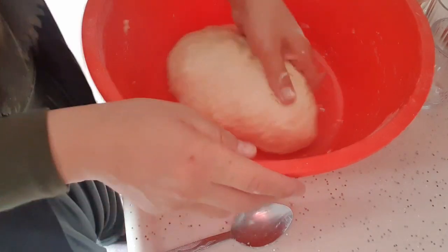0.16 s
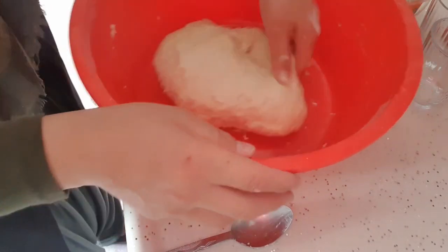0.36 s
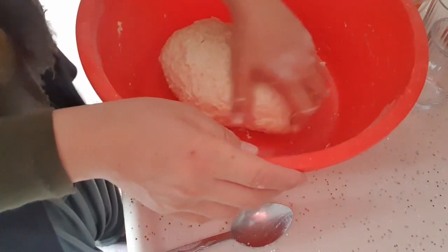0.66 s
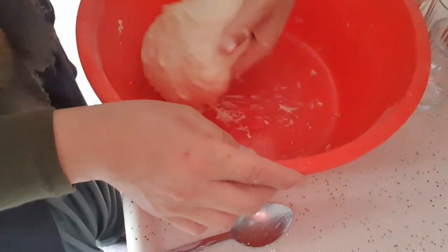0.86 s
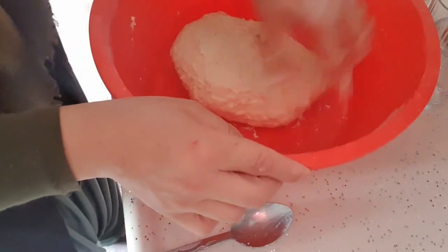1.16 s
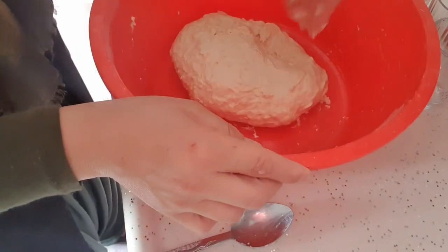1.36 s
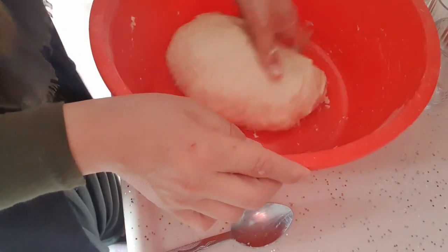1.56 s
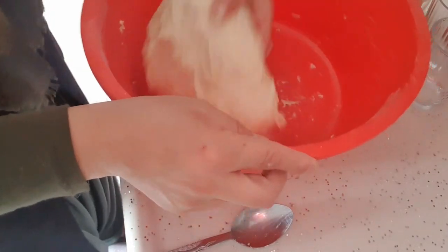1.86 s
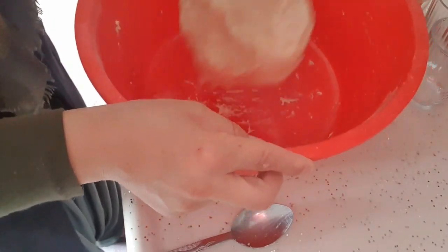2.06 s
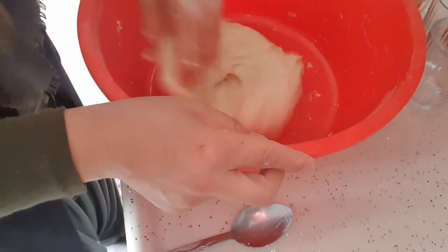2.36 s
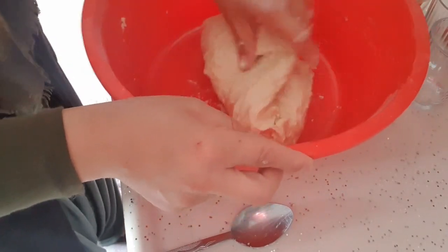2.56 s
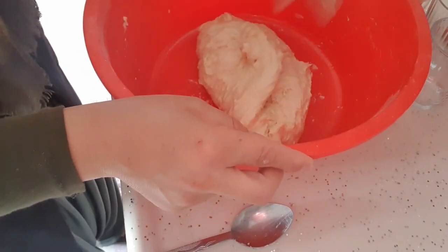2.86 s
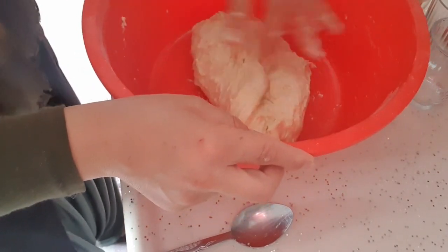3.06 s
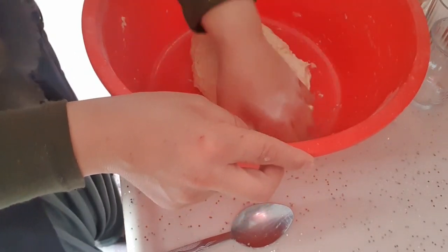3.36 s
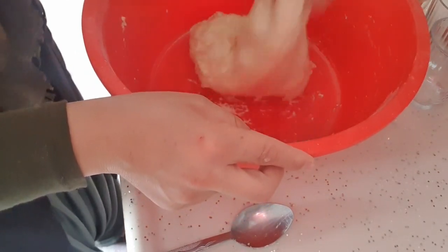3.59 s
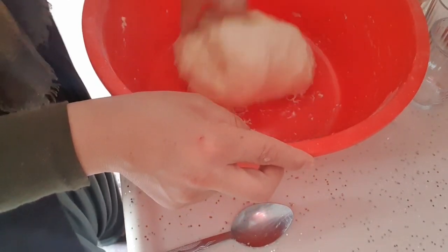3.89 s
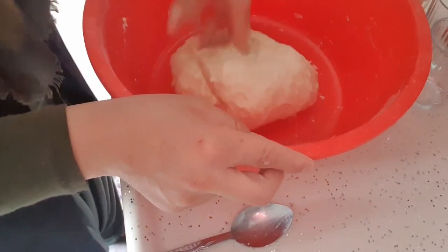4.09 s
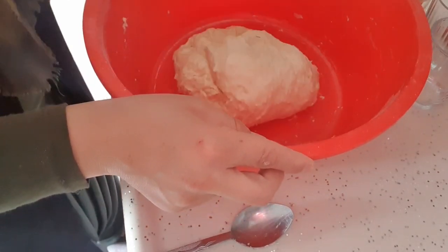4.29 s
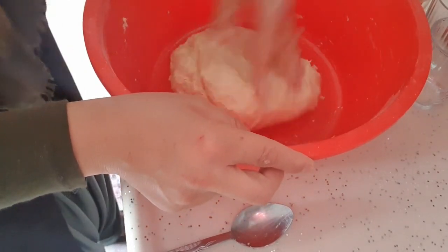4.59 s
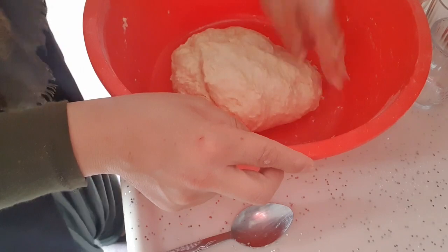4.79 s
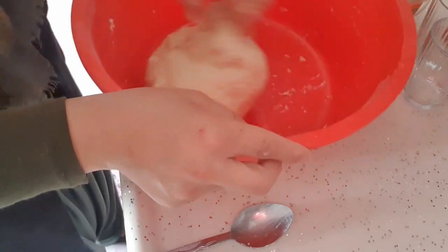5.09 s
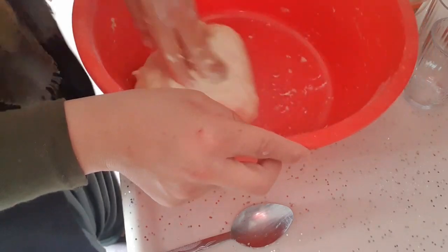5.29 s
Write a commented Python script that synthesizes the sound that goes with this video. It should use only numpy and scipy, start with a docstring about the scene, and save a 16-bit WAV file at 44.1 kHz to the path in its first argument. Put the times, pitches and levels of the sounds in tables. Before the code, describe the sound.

A hand kneads soft, sticky dough in a plastic bowl, with irregular wet slaps, hollow thuds and quiet squelches in a kitchen.

```python
"""A hard-walled kitchen, where an oiled hand kneads soft, sticky dough in a plastic bowl on the counter.
Each blow drives the bowl's mass-loaded base into damped vibration, slaps wetly and pops out trapped air.
Between blows the dough squelches and peels off the plastic: tiny cavities ring, folds slip, threads snap.
Diffuse reflections give a brief reverberation, and an appliance hums over the low rumble of the room."""
import sys
import numpy as np
from scipy import signal
from scipy.fft import rfft, irfft, next_fast_len
from scipy.io import wavfile

SR = 44100
rng = np.random.default_rng(int(sys.argv[2]) if len(sys.argv) > 2 else 0)


def generate_wav(signal):
    """Clip the signal to [-1, 1] and save it as 16-bit WAV at the path in sys.argv[1]."""
    frames = np.transpose(np.atleast_2d(signal))
    scaled = np.clip(frames, -1, 1) * 32767
    pcm = np.round(scaled).astype(np.int16)
    wavfile.write(sys.argv[1], SR, pcm)


N = 239859
TIME = np.arange(N) / SR
EVENT_TIME = TIME[:SR * 3 // 5]   # time axis of a single event
EVENT_N = len(EVENT_TIME)


# Dough landing on the base: (time [s], level [dB], loaded base pitch [Hz], contact hardness [Hz],
# counter boom [dB re level], wall ring [dB re level])
DOUGH_IMPACTS = [(0.091, -30, 115.8, 900, 0, -6), (0.284, -15, 141.6, 501.5, -23, -0.5),
                 (0.695, -35, 136, 143, -12, -2.5), (1.018, -20, 132.8, 350, -21, 0.5),
                 (1.526, -14.5, 146.5, 606, -23, 5.5), (1.546, -15, 223.8, 608, -20, -4.5),
                 (2.287, -36.5, 127, 870, -12, -4), (2.406, -25, 115.7, 710, 5, -16),
                 (2.992, -55, 215.8, 600, -10, -0.5), (3.320, -23, 126.9, 180.4, -8, 3),
                 (4.208, -56.5, 215.8, 696, -10, 9.5), (4.480, -40.5, 115, 697, 4, 5),
                 (4.909, -37, 140.9, 425, 4, 2)]

def thuds(base_t60=0.074, squash_s=0.0019, counter_hz=62, counter_t60=0.34):
    """Mass loading: the lump drives the base and lowers its pitch; wall and counter shake along."""
    out, impulse = np.zeros(N), signal.unit_impulse(EVENT_N)
    for s, db, hz, hardness_hz, boom_db, wall_db in DOUGH_IMPACTS:
        force = low_pass(impulse, hardness_hz, order=2)
        base = 2 * resonator(force, hz, base_t60) * (1 - np.exp(-EVENT_TIME / squash_s))
        counter = resonator(force, counter_hz, counter_t60) * (1 - np.exp(-EVENT_TIME * counter_hz))
        add(out, s, from_db(db) * (base + from_db(boom_db) * counter + from_db(wall_db) * bowl(force)))
    return out


# Modes of the bowl's wall: (frequency [Hz], level [dB], t60 [s])
WALL_MODES = [(213, -9.5, 0.14), (283.4, -13, 0.097), (351, -16.5, 0.11), (470.7, -24, 0.36),
              (587, -17.5, 0.085), (681.6, -30.5, 0.16), (829, -27, 0.4), (833, -38, 0.046),
              (1048, -30.5, 0.13), (1305, -30.5, 0.058), (1650, -35, 0.11), (2250, -29, 0.043),
              (2360, -32.5, 0.092)]

def bowl(force):
    """Modal superposition: the plastic wall responds as a sum of damped modes of alternating sign."""
    return sum((-1) ** k * from_db(db) * resonator(force, hz, t60)
               for k, (hz, db, t60) in enumerate(WALL_MODES))


# Spectrum of a wet contact: (frequency [Hz], spectral density [dB])
SLAP_SPECTRUM = [(100, -5.5), (250, 1), (500, 5), (1000, 2), (2200, -3), (4000, -11), (6500, -15),
                 (15000, -18)]
# Wet skin or dough smacking down: (time [s], level [dB], rise [s], t60 [s], brightness [Hz])
WET_CONTACTS = [(0.0911, -32.5, 0.00052, 0.29, 2320), (0.285, -18, .0013, 0.042, 2080),
                (0.383, -36.5, .0012, 0.081, 3530), (0.405, -39.5, 0.00079, 0.071, 5000),
                (0.720, -41.5, 0.0066, 0.22, 5500), (1.0169, -21.5, 0.0022, 0.044, 2500),
                (1.511, -32.5, 0.00018, 0.046, 3000), (1.528, -25.5, 0.00059, 0.32, 1600),
                (1.557, -20.5, .003, 0.11, 1300), (2.286, -49, 0.0011, 0.16, 750),
                (2.411, -10, 0.0012, 0.055, 4213), (3.324, -51, 0.0022, 0.32, 450),
                (3.368, -50.5, 0.023, 0.16, 2965), (4.462, -46, 0.002, 0.072, 7000),
                (4.906, -55, 0.0026, 0.17, 2980)]

def slaps(grain_db=7.0, head_on_db=-3, balance_db=1, low_edge_ratio=0.2, lead_s=0.04):
    """Impact noise: a wet contact swells as the gap closes, then spreads as a burst of tiny collapses."""
    out = np.zeros((2, N))
    for s, db, rise_s, t60, bright_hz in WET_CONTACTS:
        sizes = from_db(grain_db * np.repeat(rng.standard_normal(EVENT_N), 20)[:EVENT_N])
        noise = diffuse_noise(EVENT_N) + from_db(head_on_db) * rng.standard_normal(EVENT_N)
        burst = coloured(noise * sizes, SLAP_SPECTRUM)
        burst = high_pass(burst, low_edge_ratio * bright_hz)   # smaller contacts sound thinner
        burst = unit_rms(low_pass(burst, bright_hz, order=1))
        since_peak = EVENT_TIME - lead_s
        envelope = np.exp(np.minimum(since_peak / rise_s, -np.log(1000) * since_peak / t60))
        add(out, s - lead_s, from_db(db) * lean_left(balance_db) * burst * envelope)
    return out


# Air forced out from under the dough: (time [s], level [dB], pitch [Hz])
AIR_POCKETS = [(0.285, -15, 388), (0.287, -17.5, 774), (0.296, -23, 501), (1.541, -4.5, 803),
               (1.548, -17, 320), (1.555, -7, 828), (1.891, -42.5, 765), (1.892, -36.5, 1220),
               (2.41, -9, 462), (2.4125, -11.5, 1010), (2.413, -15, 1650), (3.5, -44.5, 867),
               (4.211, -54.5, 786), (4.462, -36, 378), (4.465, -39.5, 797), (4.668, -47.5, 426)]

def pops(opening_hz=2500, t60_cycles=21.0):
    """Cavity resonance: escaping air rings briefly; so small a source radiates little below its pitch."""
    out = np.zeros(N)
    puff = low_pass(signal.unit_impulse(EVENT_N), opening_hz, order=2)
    for s, db, hz in AIR_POCKETS:
        add(out, s, from_db(db) * resonator(high_pass(puff, hz / 2), hz, t60_cycles / hz))
    return out


# Spectra of the squeezed dough and of the oily film: (frequency [Hz], spectral density [dB])
SQUELCH_SPECTRUM = [(200, -5), (500, 0.5), (800, 3.5), (1800, -1), (3000, -8), (6000, -16.5)]
FIZZ_SPECTRUM = [(2200, -13.5), (3500, 0.5), (5000, 6.5), (6300, 1), (9000, 1), (15000, 5.5)]

def squelching(squelch_db=-1, fizz_db=1, crackle_db=-14, bubbles_db=-8, crackles_per_s=150):
    """Bubble noise: dough crackles low and the oily film fizzes, each with a few larger bubbles."""
    squelch_gain, fizz_gain = kneading()
    squelch = cavities(SQUELCH_SPECTRUM, per_s=7600, spread_db=1.5, t60_cycles=23, clump_db=1.4, bands=22)
    fizz = cavities(FIZZ_SPECTRUM, per_s=5300, spread_db=0, t60_cycles=10, clump_db=3.5, bands=18)
    clicks = rng.standard_normal((2, N)) * (rng.random(N) < crackles_per_s / SR)
    crackle = unit_rms(high_pass(coloured(clicks, FIZZ_SPECTRUM), 2000))
    bubbles = cavities(SQUELCH_SPECTRUM, per_s=180, spread_db=3, t60_cycles=30, clump_db=1, bands=16)
    dough = squelch_gain * (squelch + from_db(bubbles_db) * bubbles)
    film = fizz_gain * (fizz + from_db(crackle_db) * crackle)
    return from_db(squelch_db) * dough + from_db(fizz_db) * film


def cavities(spectrum, per_s, spread_db, t60_cycles, clump_db, bands, swell_db=2.0):
    """Shot noise: tiny cavities burst in clumps, each ringing briefly at its own pitch."""
    sizes = from_db(spread_db * np.minimum(rng.exponential(1, N), 4) + clump_db * drift(120))
    clicks = rng.standard_normal((2, N)) * sizes * (rng.random(N) < per_s / SR)
    band_of_click, out = rng.integers(0, bands, N), 0
    for k, hz in enumerate(np.geomspace(spectrum[0][0], spectrum[-1][0], bands)):
        ringing = resonator(np.diff(clicks * (band_of_click == k), prepend=0), hz, t60_cycles / hz)
        ringing = unit_rms(ringing * from_db(swell_db * drift(25)))   # folds open and close
        gain = from_db(at_hz(spectrum, hz)) * np.sqrt(hz)   # higher bands are wider
        out = out + gain * stereo(ringing, hz)
    return unit_rms(out)


# The hand pressing into the dough: (start [s], duration [s], squelch [dB], fizz [dB])
HAND_PRESSES = [(0.095, 0.037, -46.5, -62), (0.371, 0.054, -38.5, -60), (0.706, 0.028, -46.5, -79),
                (1.548, 0.015, -30, -36.5), (2.431, 0.12, -44, -67.5), (2.989, 0.021, -59, -73.5),
                (3.344, 0.036, -47, -62), (4.471, 0.063, -62.5, -63.5), (4.901, 0.017, -64, -56.5)]
# Dough peeling off plastic or skin: (start [s], duration [s], squelch [dB], fizz [dB])
DOUGH_PEELS = [(-0.04, 0.15, -64, -80), (0.153, 0.16, -44, -55), (0.77, 0.19, -50.5, -58.5),
               (0.946, 0.07, -56, -69), (1.021, .2, -47.5, -58), (1.558, .29, -50, -57.5),
               (1.792, 0.21, -54.5, -64), (1.95, 0.15, -69, -81), (2.518, .19, -58, -67),
               (3.033, 0.11, -70.5, -64), (3.411, .16, -56.5, -63.5), (3.44, 0.56, -79, -74),
               (3.941, 0.3, -68, -63.5), (4.562, .15, -65.5, -61), (4.906, .29, -52.5, -58),
               (5.15, 0.5, -77.5, -76.5)]

def kneading(attack_s=0.031, release_t60=0.11, peel_exponent=1.1):
    """Incoherent addition: presses and peels sum in power to give the envelopes of squelch and fizz."""
    power = np.zeros((2, N))
    for s, duration, *levels in HAND_PRESSES:
        rise = np.clip((TIME - s) / attack_s, 0, 1)
        release = decay(np.maximum(TIME - s - duration, 0), release_t60)
        power += np.outer(from_db(levels), rise * release) ** 2
    for s, duration, *levels in DOUGH_PEELS:
        arch = np.abs(np.sin(np.pi * np.clip((TIME - s) / duration, 0, 1)))
        power += np.outer(from_db(levels), arch ** peel_exponent) ** 2
    return np.sqrt(power)


# Wet folds skidding on the plastic: (centre time [s], level [dB], half width [s], pitch [Hz], Q [-])
SLIPPING_FOLDS = [(0.036, -56, .03, 1510, 20), (0.115, -56, 0.018, 756, 2.3), (0.33, -36, 0.018, 610, 6),
                  (0.416, -35, 0.016, 1204, 18), (0.724, -38.5, 0.0093, 2050, 5.4),
                  (1.577, -46, .025, 11460, 3), (1.873, -53, 0.047, 1687, 3.2),
                  (2.111, -63.5, 0.015, 1250, 10.3), (2.29, -56, 0.0058, 1430, 7.8),
                  (4.079, -62, 0.044, 770, 12), (4.09, -66, 0.034, 1524, 3.3),
                  (4.132, -72, .07, 4800, 2.74), (4.69, -69, 0.044, 760, 5), (4.714, -79, 0.062, 4480, 30),
                  (4.724, -77.5, 0.047, 3570, 30), (5.338, -64.5, 0.0098, 840, 2.5)]

def squishes(slips_per_s=700):
    """Stick-slip excitation: quick uneven slips ring the hollow of a fold."""
    out, middle = np.zeros((2, N)), EVENT_TIME.mean()
    for s, db, half_width, hz, q in SLIPPING_FOLDS:
        slips = stereo(rng.standard_normal((2, EVENT_N)), hz) * (rng.random(EVENT_N) < slips_per_s / SR)
        t60 = np.log(1000) * q / (np.pi * hz)
        hollow = unit_rms(resonator(np.diff(slips, prepend=0), hz, t60))
        envelope = np.exp(-((EVENT_TIME - middle) / half_width) ** 2)
        add(out, s - middle, from_db(db) * hollow * envelope)
    return out


# Sticky threads parting: (time [s], level [dB])
THREAD_BREAKS = [(0.855, -34), (1.672, -34), (1.773, -40), (2.718, -62.5), (2.7867, -49), (2.979, -51),
                 (2.9929, -39), (3.1178, -58.5), (4.0263, -58), (4.163, -52), (4.602, -57), (4.6736, -59),
                 (5.118, -47), (5.329, -61)]

def snaps(t60=0.013, bright_hz=4000):
    """Broadband transient: a thread of dough parts with a tacky tick."""
    out = np.zeros((2, N))
    for s, db in THREAD_BREAKS:
        tick = diffuse_noise(EVENT_N) * decay(EVENT_TIME, t60)
        add(out, s, from_db(db) * low_pass(tick, bright_hz, order=1))
    return out


# Reverberation time of the kitchen: (frequency [Hz], t60 [s])
REVERB_T60 = [(60, 0.41), (200, 0.42), (1000, 0.41), (3000, 0.34), (7000, 0.21), (15000, 0.2)]
# Strength of the reverberant field: (frequency [Hz], level [dB])
REVERB_LEVEL = [(60, 2), (150, -3.5), (400, -7), (1500, -4), (5000, -3.5), (14000, -4)]

def kitchen(direct, first_echo_s=0.0029, build_s=0.0024, lowest_hz=62.5):
    """Reverberation: dense reflections build up and decay exponentially, sooner in the treble."""
    field, response = rfft(diffuse_noise(EVENT_N)), 0
    octave = np.log2(np.clip(bin_hz(EVENT_N), lowest_hz, 16000) / lowest_hz)
    onset = np.clip((EVENT_TIME - first_echo_s) / build_s, 0, 1)
    for k in range(9):
        centre_hz = lowest_hz * 2 ** k
        band = irfft(field * np.maximum(1 - abs(octave - k), 0), EVENT_N)
        envelope = onset * decay(EVENT_TIME, at_hz(REVERB_T60, centre_hz))
        gain = from_db(at_hz(REVERB_LEVEL, centre_hz)) / np.linalg.norm(envelope)
        response = response + gain * band * envelope
    return signal.fftconvolve(direct, response, axes=1)[:, :N]


# Partials of the mains hum: (frequency [Hz], rms level [dB])
HUM_PARTIALS = [(49.5, -55.5), (100.5, -56), (297, -82.5), (474, -89), (594, -89.5)]

def appliance_hum(waver_db=1.3, wander_rad=0.79):
    """Random modulation: each partial of the mains hum wavers in amplitude and phase."""
    out = np.zeros(N)
    for hz, db in HUM_PARTIALS:
        amplitude = np.sqrt(2) * from_db(db + waver_db * drift(3.6))
        out += amplitude * np.sin(2 * np.pi * hz * TIME + wander_rad * drift(12))
    return out


# Background noise of the room: (frequency [Hz], spectral density [dB])
RUMBLE_SPECTRUM = [(22, -14), (40, 0.5), (60, -2), (85, -2.5), (130, -0.5), (180, -20), (300, -20),
                   (600, -32.5), (1200, -37), (3500, -44.5), (7000, -49.5), (15000, -46)]

def room_rumble(rms_db=-59):
    """Ambient noise: a steady diffuse field with most of its power in the bass."""
    noise = diffuse_noise(next_fast_len(N))[:, :N]
    return from_db(rms_db) * unit_rms(coloured(noise, RUMBLE_SPECTRUM))


# Likeness of left and right: (frequency [Hz], correlation [-])
COHERENCE = [(60, 0.95), (150, 0.87), (500, 0.74), (1000, -0.18), (2500, 0), (15000, 0.11)]

def stereo(pair, hz):
    """Spatial coherence: two independent signals mix into channels alike in the bass, not the treble."""
    alike = at_hz(COHERENCE, hz)
    mid, side = np.sqrt(1 + alike) * pair[0], np.sqrt(1 - alike) * pair[1]
    return np.array([mid + side, mid - side]) / np.sqrt(2)


def diffuse_noise(size):
    """Diffuse field: white noise arriving from all round."""
    return irfft(stereo(rfft(rng.standard_normal((2, size))), bin_hz(size)), size)


def lean_left(db):
    """Level panning: gains that raise the left and lower the right by db each."""
    return from_db([[db], [-db]])


def drift(knots_per_s):
    """Interpolated noise: a slow random curve of unit variance."""
    knots = rng.standard_normal(4000)
    return np.interp(TIME * knots_per_s, np.arange(len(knots)), knots) * np.sqrt(3 / 2)


def resonator(x, hz, t60):
    """Damped oscillator: a unit impulse starts a decaying sine of height 1."""
    radius, angle = from_db(-60 / (t60 * SR)), 2 * np.pi * hz / SR
    return signal.lfilter([0, np.sin(angle)], [1, -2 * radius * np.cos(angle), radius ** 2], x + 1e-18)


def decay(t, t60):
    """Exponential decay, 60 dB in t60 seconds."""
    return np.exp(-np.log(1000) * t / t60)


def low_pass(x, hz, order):
    """Causal attenuation above hz."""
    return signal.sosfilt(signal.butter(order, hz, fs=SR, output="sos"), x + 1e-18)


def high_pass(x, hz):
    """Causal attenuation below hz."""
    return signal.sosfilt(signal.butter(2, hz, "high", fs=SR, output="sos"), x)


def coloured(x, spectrum):
    """Zero-phase filtering by a smooth spectrum."""
    size = next_fast_len(x.shape[-1] + SR // 10)
    return irfft(rfft(x, size) * from_db(at_hz(spectrum, bin_hz(size))), size)[..., :x.shape[-1]]


def at_hz(points, hz):
    """Interpolation on a log-frequency axis."""
    known_hz, values = np.transpose(points)
    return np.interp(np.log(np.maximum(hz, 1)), np.log(known_hz), values)


def bin_hz(size):
    """Frequencies of a real FFT."""
    return np.arange(size // 2 + 1) * SR / size


def from_db(db):
    """Decibels to amplitude ratio."""
    return 10 ** (np.asarray(db) / 20)


def unit_rms(x):
    """Normalisation to unit power."""
    return x / np.sqrt(np.mean(x ** 2) + 1e-20)


def add(track, s, sound):
    """Superposition of a sound at time s, or at zero if s is negative."""
    start = max(round(s * SR), 0)
    track[..., start:start + sound.shape[-1]] += sound[..., :N - start]


def scene(wall_db=-34, balance_db=1.0):
    """Forced vibration: the wet sounds also drive the bowl, and all the kneading excites the room."""
    wet = slaps() + pops() + (snaps() + squishes() + squelching()) * lean_left(balance_db)
    direct = wet + from_db(wall_db) * bowl(wet) + thuds()
    return direct + kitchen(direct) + appliance_hum() + room_rumble()


# Frequency response of the microphone: (frequency [Hz], gain [dB])
MICROPHONE_RESPONSE = [(20, -24.5), (48, -1.5), (6600, 1), (7500, -8), (8500, -7), (9600, -3), (13000, -2),
                       (16000, -8)]

def record(dry, ceiling=0.85, cutoff_hz=15950):
    """Band limiting and saturation: the microphone dulls the treble above 7 kHz and rounds the peaks."""
    rounded = ceiling * np.tanh(coloured(dry, MICROPHONE_RESPONSE) / ceiling)
    return signal.sosfilt(signal.ellip(10, .2, 80, cutoff_hz, fs=SR, output="sos"), rounded)


dry = scene()
out = record(dry)
generate_wav(out)
```